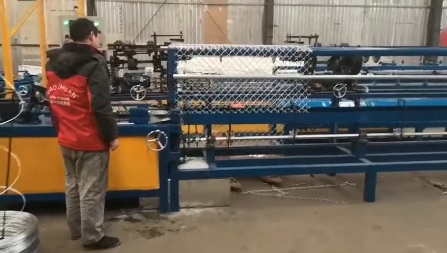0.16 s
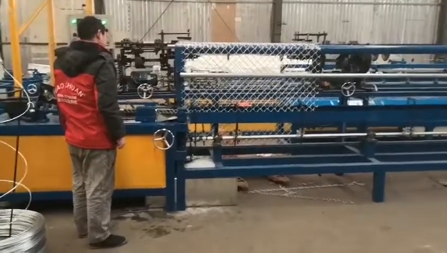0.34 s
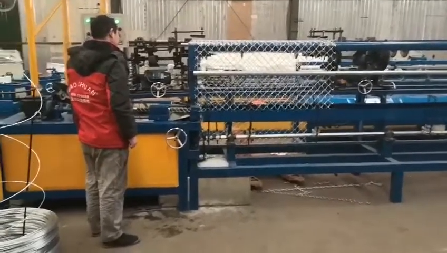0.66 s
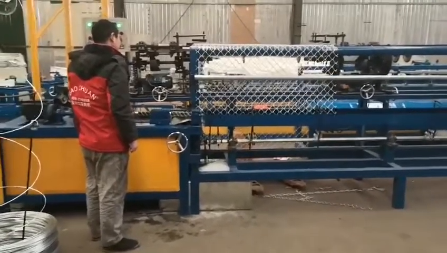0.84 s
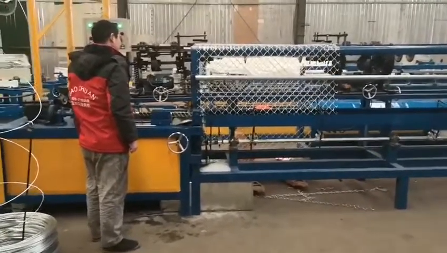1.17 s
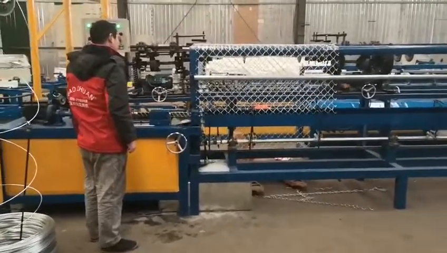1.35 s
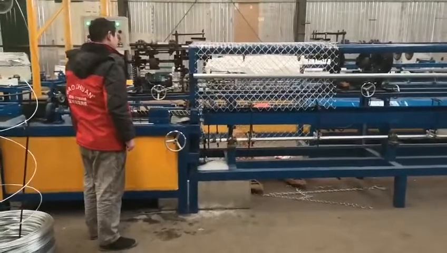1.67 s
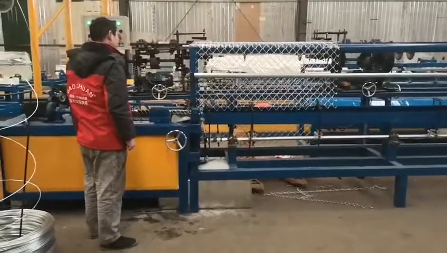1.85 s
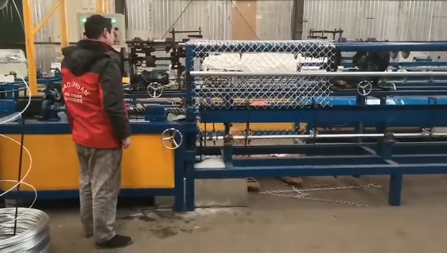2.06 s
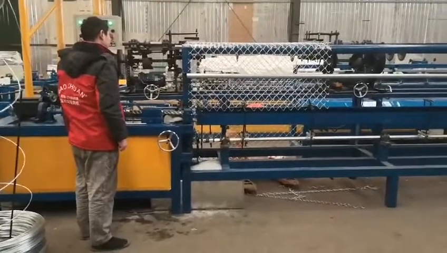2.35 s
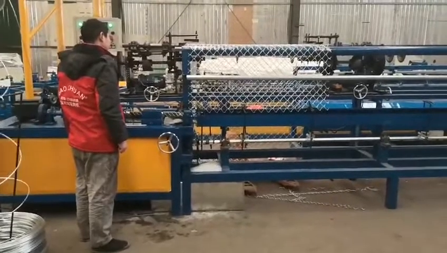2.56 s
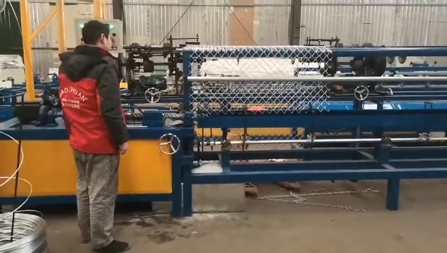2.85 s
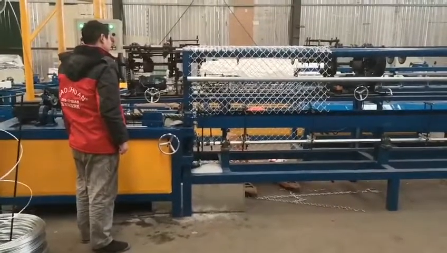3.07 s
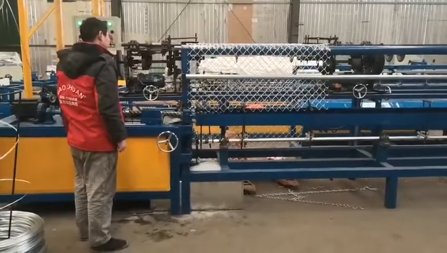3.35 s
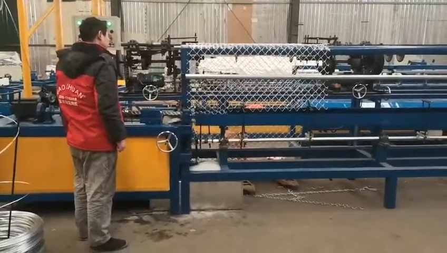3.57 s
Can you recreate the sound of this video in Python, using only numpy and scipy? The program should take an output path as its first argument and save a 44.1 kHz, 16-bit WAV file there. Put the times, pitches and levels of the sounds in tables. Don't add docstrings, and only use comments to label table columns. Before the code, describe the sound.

A weaving machine for wire mesh hisses over distant motor noise; a heavy part bangs and bounces early on, then the drive spins up, hums, clatters and sings, with bright wire clanks near the end.

```python
import sys
import numpy as np
from scipy import signal
from scipy.fft import rfft, irfft, next_fast_len
from scipy.io import wavfile

SR = 44100
rng = np.random.default_rng(int(sys.argv[2]) if len(sys.argv) > 2 else 0)


def wav_out(sig):
    wavfile.write(sys.argv[1], SR, np.round(np.clip(np.atleast_2d(sig).T, -1, 1) * 32767).astype(np.int16))


def invert_db(level):
    return 10 ** (np.asarray(level, dtype=float) / 20)


N = 164052
T = np.arange(N) / SR
RIGHT_LAG = 11

# (frequency [Hz], level per Hz [dB])
WIRE_COLOUR = [(2500, 2.5), (3300, -3.5), (4200, 0.5), (5800, 2), (6700, -4), (7800, 4), (8600, -6.5),
               (9300, -7)]
# (time [s], peak level [dB], rattle length [s], favoured pitch [Hz])
CLANKS = [(2.954, -20.5, 0.024, 7600), (3.163, -14.5, 0.01, 6800), (3.173, -21, 0.023, 3730),
          (3.22, -16, 0.016, 6740), (3.329, -16.5, 0.01, 7000), (3.33, -18.5, 0.018, 3670),
          (3.36, -27, 0.0096, 3650), (3.454, -18.5, 0.015, 3680), (3.456, -14.5, 0.059, 7500),
          (3.523, -23, 0.024, 3760), (3.48, -28, 0.011, 3670), (3.56, -17, 0.012, 3850),
          (3.61, -20, 0.016, 7100), (3.634, -18, 0.023, 3750), (3.642, -8.5, 0.0086, 5650),
          (3.643, -20, 0.012, 7850), (0.62, -18, 0.011, 7800)]


def rms_one(x):
    return x / np.sqrt(np.mean(x ** 2) + 1e-20)


def in_time(rows):
    return np.interp(T, *np.transpose(rows))


def at_hz(points, hz):
    table_hz, value = np.array(points).T
    return np.interp(np.log(hz), np.log(table_hz), value)


def drift(rate, size=N):
    r = np.exp(-80 * np.pi * rate / SR)
    white = rng.standard_normal(N // 40 + 2002)
    slow = rms_one(signal.lfilter([1], [1, -2 * r, r * r], white)[2000:])
    return np.interp(np.arange(size) / 40, np.arange(len(slow)), slow)


def resonance(x, hz, width_hz):
    r = np.exp(-np.pi * abs(width_hz) / SR)
    top = np.array([1, 0, -1]) * (1 - r * r) / 2
    return signal.lfilter(top, [1, -2 * r * np.cos(2 * np.pi * hz / SR), r * r], x + 1e-18)


def pair(mid, side, hz):
    # (frequency [Hz], left-right likeness [0..1])
    likeness = [(60, .999), (130, 1), (290, 0.98), (630, 0.057), (1380, 0.085), (3020, 0.044),
                (8000, 0.045)]
    # (frequency [Hz], left over right [dB])
    tilt = [(200, -1), (400, -2.5), (750, 7.5), (1150, 0), (1900, -5), (4080, -10), (6220, -3.5),
            (9000, 10.5)]
    alike = np.clip(at_hz(likeness, hz), -.95, .9995)
    pan_db = at_hz(tilt, hz) * (60 < hz < 11500)
    sign = np.array([[1], [-1]])
    both = np.sqrt(1 + alike) * mid + np.sqrt(1 - alike) * side * sign
    return both * invert_db(sign * pan_db / 2)


def banded_noise(spectrum, patchy_db, shared, shape=lambda hz: 1, white=None):
    low_hz, high_hz = spectrum[0][0] / 1.1, spectrum[-1][0] * 1.05
    bands = max(int(2.5 * np.log2(high_hz / low_hz)), 7)
    edges = np.geomspace(low_hz, high_hz, bands + 1)
    out, power, together = 0, 0, drift(1.72)
    white = rng.standard_normal((2, 2, N)) if white is None else white
    for k, (low, high) in enumerate(zip(edges, edges[1:])):
        band = signal.butter(2, [low, high], "band", fs=SR, output="sos")
        mid, side = signal.sosfilt(band, white[k % 2])
        hz = np.sqrt(low * high)
        gain = invert_db(at_hz(spectrum, hz))
        power += gain ** 2 * np.mean(mid ** 2)
        flicker = invert_db(patchy_db * (shared * together + drift(11.0)))
        out = out + gain * flicker * shape(hz) * pair(mid, side, hz)
    return out / np.sqrt(power)


def narrow(hz, width_hz, size=N):
    white = rng.standard_normal((2, size))
    mid, side = resonance(resonance(white, hz, width_hz), hz, width_hz)
    return pair(rms_one(mid), rms_one(side), hz)


def ringing_noise():
    share, ring_width_hz, swell_db = .4, 14, 2.5
    size = next_fast_len(N)
    white, bin_hz = rng.standard_normal((2, 2, N)), SR / size
    out = white.copy()
    offset_hz = np.arange(-400, 401) * bin_hz
    ring = 1 / (1 + (2 * offset_hz / ring_width_hz) ** 2)
    for _ in range(3):
        marks = (rng.random(size // 2 + 1) < bin_hz / 140) * rng.random(size // 2 + 1)
        in_range = abs(np.arange(len(marks)) * bin_hz - 4700) < 3900
        peaks = np.convolve(marks, ring, "same") * in_range
        rings = irfft(rfft(rng.standard_normal((2, N)), size) * peaks, size)[:, :N]
        out += share * rms_one(rings) * invert_db(swell_db * drift(1.8))
    return out


def hall_roar():
    # (time [s], level [dB])
    roar = [(0, -21.5), (.08, -28), (.55, -27.5), (1.25, -28), (1.5, -34), (2.0, -29), (2.6, -30),
            (3.0, -29.5), (3.25, -25.5), (3.42, -29), (3.5, -25), (3.58, -20.5), (3.72, -27.5)]
    # (frequency [Hz], level per Hz [dB])
    hall_colour = [(400, -8), (600, -8), (850, -2.5), (1200, 0.5), (1470, 5), (1860, 3), (2600, -7),
                   (4000, -16.5)]
    # (frequency [Hz], level per Hz [dB])
    rumble_colour = [(30, -7), (48, -8), (75, -3), (122, 1.5), (200, -2), (300, -5), (400, -11)]
    hall = invert_db(in_time(roar)) * banded_noise(hall_colour, 1.0, 0.57, white=ringing_noise())
    return hall + invert_db(-37) * banded_noise(rumble_colour, 0.16, 0.81)


def other_motors():
    # (frequency [Hz], width [Hz], level [dB])
    motor_lines = [(49.8, 3, -47), (175, 6, -46), (2415, 25, -46), (2761, 18, -46), (7700, 400, -40)]
    return sum(invert_db(db + 1.6 * drift(1.8)) * narrow(hz, width_hz) for hz, width_hz, db in motor_lines)


def dropped_part():
    # (time [s], level [dB])
    blows = [
        (0.624, -16),
        (.64, -27),
        (.73, -20.5),
        (.8, -24),
        (2.64, -30),
        (3.499, -31.5),
    ]
    # (frequency [Hz], level per Hz [dB])
    blow_colour = [(50, 5.5), (125, 2), (540, -16), (980, -4), (2300, -2.5), (3100, -11), (4200, -16),
                   (8000, -22)]
    # (frequency [Hz], time to fall 60 dB [s])
    echo_t60 = [(60, 0.18), (250, 1.5), (1300, 1.63), (2500, 0.99), (6000, 1.35)]
    t = T[::20]

    def shape(hz):
        energy = 0
        for s, db in blows:
            decay_db = 120 * np.clip(t - s, 0, None) / at_hz(echo_t60, hz)
            onset = np.clip((t - s) / (0.0024 + 1.1 / hz), 0, 1)
            energy = energy + invert_db(2 * db - decay_db) * onset
        return np.interp(T, t, np.sqrt(energy))

    return banded_noise(blow_colour, 0.44, 0.37, shape)


def knocks():
    # (peak time [s], pitch [Hz], level [dB])
    frame_knocks = [(0.634, 842, -31), (0.636, 1000, -37), (0.661, 2148, -26), (0.698, 1906, -35),
                    (0.703, 958, -30.4), (0.741, 1980, -33), (0.756, 1346, -28.3), (0.793, 1114, -39),
                    (0.801, 1003, -30), (0.885, 965, -37), (0.935, 1570, -30.5), (1.911, 1434, -27),
                    (2.063, 1997, -25), (2.108, 1997, -21.5), (2.439, 1785, -28.2), (2.494, 2100, -26.5),
                    (2.559, 1981, -27), (2.562, 2160, -30), (2.612, 2090, -23), (2.651, 2099, -26.9),
                    (2.741, 2075, -26), (2.759, 1810, -34), (2.769, 2240, -23), (2.801, 1790, -26.6),
                    (2.809, 1920, -28), (2.811, 2150, -24.5), (2.854, 2016, -28), (2.886, 2412, -26.5),
                    (2.921, 1750, -31), (3.08, 2180, -27.5), (3.105, 2030, -32), (3.145, 2020, -24),
                    (3.15, 2202, -24), (3.18, 1927, -21), (3.185, 2190, -28), (3.198, 2050, -22),
                    (3.205, 1760, -28.5), (3.233, 2030, -23.5), (3.3, 2417, -24), (3.315, 2013, -26),
                    (3.357, 1920, -28), (3.472, 1477, -24.5), (3.51, 1780, -32), (3.532, 2210, -27.7),
                    (3.572, 1913, -22), (3.609, 2186, -27.5), (3.639, 2045, -23), (3.689, 2428, -25.5)]
    # (peak time [s], pitch [Hz], level
    # [dB])
    bar_knocks_and_thumps = [(1.07, 1450, -44), (1.13, 1540, -32), (1.201, 1504, -33), (1.25, 1520, -37), (1.4, 1470, -34),
                             (1.445, 1460, -29.5), (1.59, 1480, -33), (1.635, 1440, -39), (1.68, 1440, -28.5),
                             (1.77, 1420, -31), (1.83, 1442, -30), (1.98, 1430, -32), (2.07, 1425, -31),
                             (2.105, 1430, -33), (2.665, 936, -34), (.656, 140, -29.5), (0.752, 119, -29), (.68, 201, -32),
                             (0.871, 202, -31)]
    # (frequency [Hz], left over right [dB])
    knock_pan = [(300, 0), (850, 13), (1100, -4), (1450, -15), (2100, -14)]
    half_width_s, cycles, twin_share, twin_hz = .012, 2.2, .4, 45
    out = np.zeros((2, N))
    for s, hz, db in list(frame_knocks) + list(bar_knocks_and_thumps):
        span = slice(int((s - .07) * SR), int((s + .07) * SR))
        t = T[span] - s + np.array([[0], [RIGHT_LAG / SR]])
        sides = invert_db(at_hz(knock_pan, hz) * np.array([[.5], [-.5]]))
        bell = np.exp(-.5 * (t / (half_width_s + cycles / hz)) ** 2)
        second_hz = hz + twin_hz * rng.choice([-1, 1])
        ring = np.sin(2 * np.pi * hz * t) + twin_share * np.sin(2 * np.pi * second_hz * t)
        out[:, span] += invert_db(db) * np.sqrt(2) * sides / sides.mean() * bell * ring
    return out


def hum():
    # (time [s], level [dB])
    hum_level = [(1.78, -80), (1.86, -39), (2.12, -32.5), (2.2, -29), (3.1, -27), (3.4, -33.5),
                 (3.5, -26.5), (3.72, -28)]
    # (peak time [s], level [dB])
    surges = [(1.893, -25), (1.965, -25.5), (2.022, -26.5), (2.083, -19.5), (2.198, -25), (2.315, -23),
              (2.35, -24.5), (2.39, -24), (2.447, -28), (2.487, -27), (2.594, -26), (2.661, -24.5),
              (2.746, -20.5), (2.878, -30), (2.931, -25), (2.976, -21), (3.056, -23), (3.12, -24),
              (3.188, -22.5), (3.275, -19), (3.32, -24.5), (3.385, -22), (3.462, -26.5), (3.579, -25),
              (3.682, -26)]
    hum_hz, wobble_db, surge_s = 229.8, 1.0, 0.012
    spin_up_s, spin_up_hz, spin_up_time_s = 1.88, 17, 0.094
    panel_hz, panel_width_hz, panel_db = 214, 20, -10
    hz = hum_hz - spin_up_hz * np.exp(-np.clip(T - spin_up_s, 0, None) / spin_up_time_s)
    base = invert_db(in_time(hum_level))
    coarse = T[::16]
    surge = sum(invert_db(2 * db) * np.exp(-((coarse - s) / surge_s) ** 2) for s, db in surges)
    strength = np.sqrt(base ** 2 + np.repeat(surge, 16)[:N])
    phase = 2 * np.pi * np.cumsum(hz) / SR + 0.38 * drift(9.9)
    tone = np.sqrt(2) * np.sin(phase) * invert_db(wobble_db * drift(1))
    panel = base * invert_db(panel_db) * narrow(panel_hz, panel_width_hz)
    return strength * tone * invert_db(np.array([[-.2], [.2]])) + panel


def gear_clatter():
    # (time [s], level [dB])
    load = [(.9, -56), (1.2, -27.5), (1.8, -32.5), (2.0, -23.5), (2.3, -22), (2.5, -22), (2.8, -21),
            (3.0, -19), (3.2, -23), (3.4, -25), (3.55, -26.5), (3.72, -20.5)]
    # (frequency [Hz], level per Hz [dB])
    gear_colour = [(300, 4), (600, -26.5), (1100, -19), (1500, -40), (2000, 5.5), (2400, 7.5), (3000, -8.5),
                   (4000, -2)]
    return invert_db(in_time(load) - 4.5) * banded_noise(gear_colour, 1.58, 1.0, white=ringing_noise())


def singing_bars():
    # (start [s], length [s], pitch [Hz])
    bars = [(.68, .27, 955), (.86, .3, 1550), (1.02, .25, 1415), (1.38, .74, 1432), (1.94, .14, 2000),
            (2.13, .5, 1985), (2.1, .6, 1404), (2.38, .45, 1815), (2.4, .45, 2100), (2.6, .65, 1240),
            (2.85, .5, 2040), (2.8, .7, 1510), (3.46, .2, 3660)]
    bar_db = [-43, -35, -34, -39, -34, -36, -38.5, -40, -30, -38, -33.5, -35, -35]
    width_hz, edge_s, pure, noise, throb_db = 40, .03, .6, .75, 2.5
    out = np.zeros((2, N))
    for (start, length, hz), level_db in zip(bars, bar_db):
        span = slice(max(int((start - .1) * SR), 0), int((start + length + .1) * SR))
        t = T[span]
        rise = t - start + edge_s
        fall = (start + length - t) / 2 + edge_s
        gate = np.clip(np.minimum(rise, fall) / (2 * edge_s), 0, 1)
        phase = 2 * np.pi * hz * t + 1.5 * drift(8, len(t))
        tone = pair(np.sin(phase), -np.cos(phase), hz) * np.sqrt(2)
        throb = invert_db(level_db + throb_db * drift(25, len(t)))
        out[:, span] += throb * gate * (pure * tone + noise * narrow(hz, width_hz, size=len(t)))
    return out


def clank_puffs():
    s, db, length, _ = np.transpose(CLANKS)[:, :, None]
    tail = np.exp(-np.clip(T - s - length, 0, None) / 0.022)
    return np.sqrt(np.sum((invert_db(db) * (T >= s) * tail) ** 2, axis=0))


def clanks(puffs):
    # (pitch [Hz], level [dB], time to fall 60 dB [s])
    spiral_modes = [(3620, 0, .035), (3720, -1, .035), (4400, -6, .015), (5000, -5, .015), (5640, -2, .025),
                    (5900, -5, .02), (6800, -1, .025), (7050, -3, .02), (7480, -3, .02), (7900, -2, .02)]
    touches_per_s, clank_db, hiss_db, off_pitch_db = 1980, -11, -10, -42
    s, db, length, pitch = np.transpose(CLANKS)[:, :, None]
    after = np.clip(T - s - length, 0, None)
    burst = invert_db(db) * (T >= s) * np.exp(-after / .003 - np.clip(T - s, 0, 1) / .04)
    out = invert_db(hiss_db) * puffs * banded_noise(WIRE_COLOUR, 0.41, .5)
    for hz, level_db, t60 in spiral_modes:
        touches = (rng.random((2, N)) < touches_per_s / SR) * rng.standard_normal((2, N))
        favour = invert_db(off_pitch_db * abs(np.log2(hz / pitch[:, 0])))
        force = touches * (favour @ burst)
        r, w = invert_db(-60 / (abs(t60) * SR)), 2 * np.pi * hz / SR
        mid, side = signal.lfilter([0, np.sin(w)], [1, -2 * r * np.cos(w), r * r], force + 1e-18)
        out = out + invert_db(clank_db + level_db) * pair(mid, side, hz)
    return out


def wire():
    # (time [s], level [dB])
    feed_level = [(0, -26), (.3, -25.5), (.55, -24), (.7, -28), (1.6, -24), (2.1, -23), (2.3, -24.5),
                  (2.5, -22), (2.75, -25), (3.1, -25), (3.42, -25.5), (3.72, -22)]
    # (frequency [Hz], level per Hz [dB])
    air_colour = [(10200, -7), (10800, 5.5), (11900, -7), (13000, -1.5), (15000, -8.5)]
    feed, puffs = invert_db(in_time(feed_level)), clank_puffs()
    metal = feed * banded_noise(WIRE_COLOUR, 0.77, 1.0, white=ringing_noise()) + clanks(puffs)
    dull = signal.butter(8, 8800, fs=SR, output="sos")
    metal = signal.sosfilt(dull, metal) + 0.026 * metal
    air_level = (feed / feed.mean() + invert_db(4) * puffs) * invert_db(-52.5)
    return metal + air_level * banded_noise(air_colour, 0.95, 0.65)


def scene():
    background = hall_roar() + other_motors()
    events = dropped_part() + knocks()
    drive = hum() + gear_clatter() + singing_bars()
    return background + events + drive + wire()


def roll_off(x):
    return signal.sosfilt(signal.butter(12, 15060, fs=SR, output="sos"), x)


def record(dry):
    ports = np.array([dry[0], np.roll(dry[1], RIGHT_LAG)])
    return roll_off(1.2 * np.tanh(ports / 1.2))


dry = scene()
out = record(dry)
wav_out(out)
```